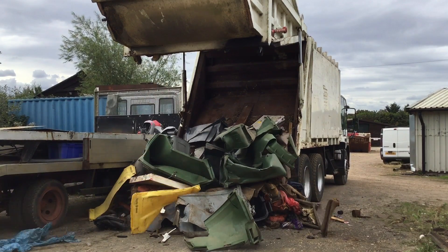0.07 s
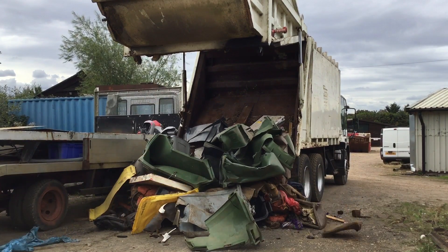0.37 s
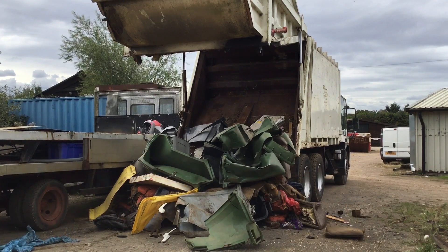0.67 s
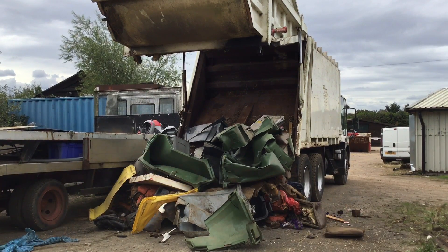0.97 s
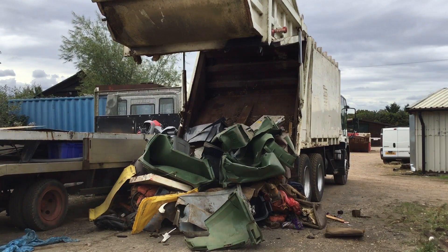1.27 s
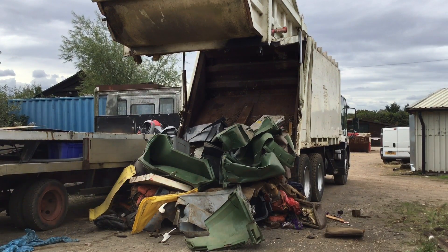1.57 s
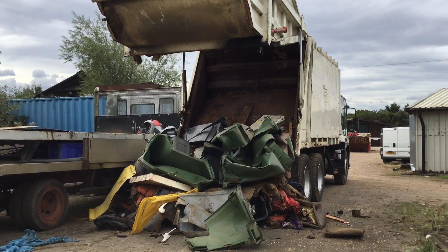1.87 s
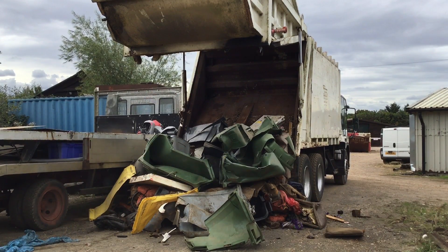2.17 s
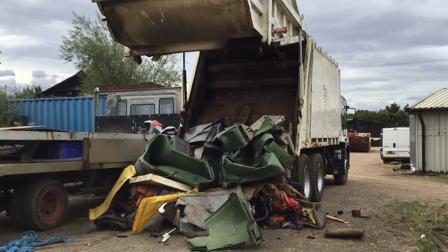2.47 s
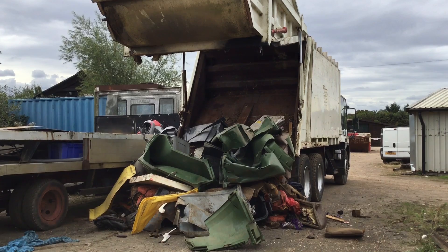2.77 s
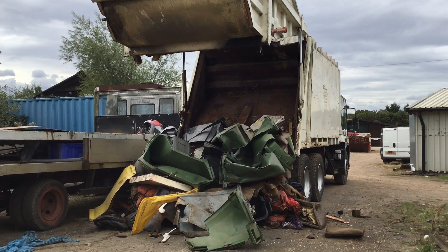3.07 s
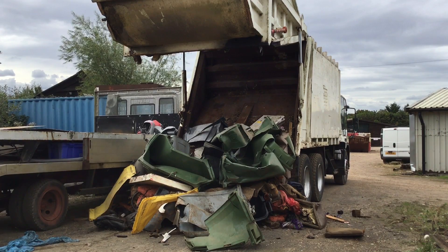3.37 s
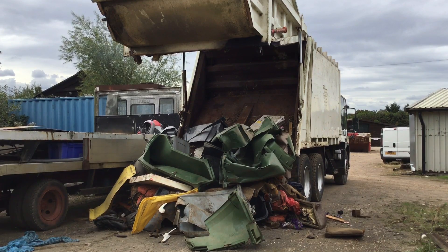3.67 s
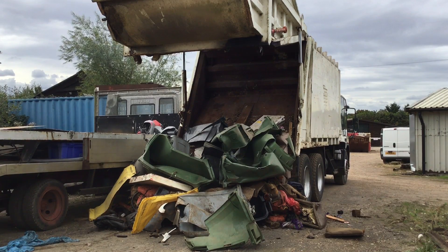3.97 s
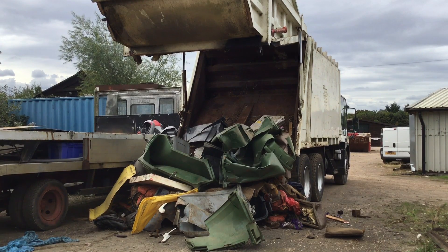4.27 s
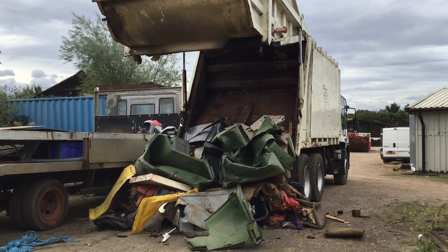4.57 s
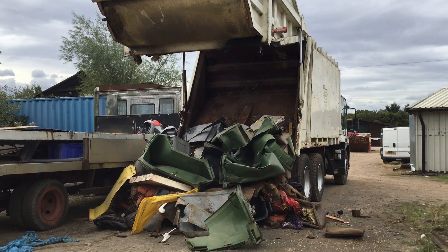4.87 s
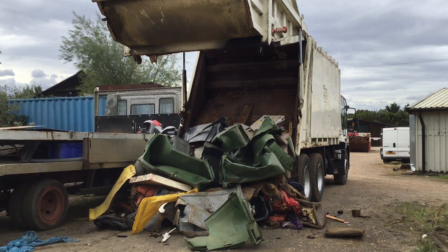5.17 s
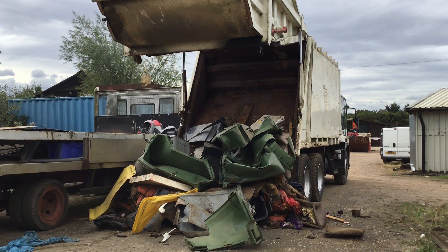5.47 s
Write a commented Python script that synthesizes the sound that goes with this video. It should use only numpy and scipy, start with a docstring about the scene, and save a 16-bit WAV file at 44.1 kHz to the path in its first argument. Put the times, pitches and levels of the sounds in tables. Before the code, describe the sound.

A refuse truck's diesel and hydraulic pump drone while its load slides out, hollow bins thudding, plastic cracking and metal clanking, then settling.

```python
"""Refuse truck dumping broken plastic bins.

A six-cylinder diesel at fast idle drives a humming hydraulic pump; gears whine, an oil valve whistles.
The load slides out over the steel floor, rumbling, scraping and squealing, while grit trickles.
Hollow bins boom, scrap metal clanks, plastic pieces crack and clatter.
The open steel body and the yard answer the crashes with a short tail."""
import sys
import numpy as np
from scipy import signal
from scipy.fft import rfft, irfft, next_fast_len
from scipy.io import wavfile
from scipy.ndimage import uniform_filter1d, map_coordinates

SR = 44100
rng = np.random.default_rng(int(sys.argv[2]) if len(sys.argv) > 2 else 0)


def waveform_to_disk(signal):
    """Save audio, clipped to [-1, 1], as 16-bit WAV at the path in sys.argv[1]."""
    frames = np.transpose(np.atleast_2d(signal))
    scaled = np.clip(frames, -1, 1) * 32767
    samples = np.round(scaled).astype(np.int16)
    wavfile.write(sys.argv[1], SR, samples)


N = 243873
TIME = np.arange(N) / SR
AGE = np.arange(SR // 2) / SR  # time since a blow [s]


def amp(db):
    """Decibels to gain."""
    return 10 ** (np.asarray(db) / 20)


def unit(x):
    """Scale to rms 1."""
    return x / np.sqrt(np.mean(x ** 2) + 1e-20)


def fade(t60):
    """Free decay, 60 dB in t60 seconds."""
    return np.exp(-np.log(1000) * AGE / np.maximum(t60, 1e-3))


def along(points, hz):
    """Interpolate (frequency, value) points on a log axis."""
    knots_hz, values = np.transpose(points)
    return np.interp(np.log(hz + 1), np.log(knots_hz + 1), values)


def curves(rows):
    """One value per sample for each column after the time."""
    times, *columns = np.transpose(rows)
    return [np.interp(TIME, times, column) for column in columns]


def wobble(rate_hz):
    """Smooth random curve, rate_hz knots a second."""
    return map_coordinates(rng.standard_normal(int(N * rate_hz / SR) + 4), [TIME * rate_hz])


def swell(centre_s, length_s):
    """Smooth rise from 0 to 1 and back."""
    return np.cos(np.pi * np.clip((TIME - centre_s) / length_s, -.5, .5)) ** 2


def resting(start_s=2.9, length_s=.9):
    """Ramp from 0 to 1 as the heap comes to rest."""
    return np.clip((TIME - start_s) / length_s, 0, 1)


def colour(x, gain_db):
    """Minimum-phase filter with response gain_db(hz)."""
    size = 2 * next_fast_len(len(x) // 2 + 4096)
    cepstrum = irfft(np.log(amp(gain_db(np.fft.rfftfreq(size, 1 / SR)))), size)
    cepstrum[1:size // 2] *= 2
    cepstrum[size // 2 + 1:] = 0
    return irfft(rfft(x, size) * np.exp(rfft(cepstrum)), size)[:len(x)]


def shaped(x, spectrum):
    """Filter by a spectrum table, scale to rms 1."""
    return unit(colour(x, lambda hz: along(spectrum, hz)))


def grains(size, per_s, spread_db):
    """Tiny contacts, random in time and strength."""
    contacts = (rng.random(size) < per_s / SR) * rng.choice([-1, 1], size)
    return contacts * amp(spread_db * np.clip(rng.standard_normal(size), -2, 2))


def modes(table):
    """Damped sines of a struck piece, slightly different at each blow."""
    return sum(amp(db + rng.normal(0, 2)) * fade(t60) * np.sin(2 * np.pi * hz * rng.normal(1, .008) * AGE)
               for hz, db, t60 in table)


def excite(force, ring):
    """Drive a ringing piece with a contact force."""
    return signal.fftconvolve(force, ring)[:len(AGE)]


def add(track, s, db, blow):
    """Mix in a blow at time s, its loudest 20 ms at db rms."""
    start = max(round(s * SR), 0)
    loudest = np.sqrt(uniform_filter1d(blow ** 2, size=882).max())
    track[start:start + len(blow)] += (amp(db) * blow / loudest)[:N - start]


def whistle(path, waver_hz):
    """Unsteady sine along (time [s], pitch [Hz], level [dB]) points."""
    hz, db = curves(path)
    gain = amp(db + 3 * wobble(15))
    return gain * np.sin(2 * np.pi * np.cumsum(hz + waver_hz * wobble(400)) / SR)


def shaft_tone(turns, order, drift_rad):
    """Sine of rms 1 at a multiple of the shaft rate."""
    return np.sqrt(2) * np.sin(2 * np.pi * (order * turns + rng.random()) + drift_rad * wobble(9))


# Reverberation: (frequency [Hz], t60 [s])
YARD_DECAY = [(100, 0.36), (1000, 0.17), (5000, 0.15), (14000, 0.31)]
def yard(x):
    """The steel body and nearby walls return a short diffuse tail."""
    hz, age, noise = signal.stft(rng.standard_normal(SR // 2), SR, nperseg=256)
    decay = np.exp(-np.log(1000) * age / along(YARD_DECAY, hz)[:, None])
    tail = signal.istft(noise * decay, SR, nperseg=256)[1]
    delayed = np.pad(x, (400, 0))
    return signal.fftconvolve(delayed, tail / np.linalg.norm(tail))[:N]


# Shaft tones: (order [per turn], rms level [dB])
HUM_ORDERS = [(3, -33), (5, -51), (6, -45.5), (8, -56.5), (9, -48), (10, -36), (12, -55), (12.5, -56),
              (13.5, -59.5), (14.5, -56), (15.5, -55.5), (17.5, -55), (18.5, -54), (20, -47.5), (22, -57.5),
              (24, -65.5), (26, -66.5), (30, -62), (31, -61), (33, -60.5), (34, -57.5), (35.5, -61),
              (39, -58.5), (39.5, -63.5), (40, -59.5), (42, -64), (44, -64.5), (72, -63), (84, -64.5),
              (136, -62)]
def hum(turns):
    """Tones locked to the shaft: firing at order 3, pump at order 10."""
    return sum(amp(db + 0.15 * wobble(5)) * shaft_tone(turns, order, 0.012 + 0.00074 * order)
               for order, db in HUM_ORDERS)


def gear_whine(turns):
    """The mesh throbs once a turn, strains once at a higher pitch and eases as the load comes off."""
    throb_depth = .4 + .35 * resting()
    throb = 1 + throb_depth * np.sin(2 * np.pi * turns)
    mesh = amp(.5 * wobble(10)) * shaft_tone(turns, order=102, drift_rad=.15) * throb
    strain = swell(centre_s=1.38, length_s=.7)
    strained = amp(-49.5) * strain * shaft_tone(turns, order=103, drift_rad=.4)
    return amp(-54.5 - 2.5 * resting()) * (1 - strain / 2) * mesh + strained


# Valve gear and injector pulsing: (order [per turn], depth [dB])
CLATTER_BEATS = [(1, .85), (2, .95), (5, .65), (6, .75), (11, .75), (12, .65), (16, .6)]
# Engine block: (frequency [Hz], gain [dB])
BLOCK_SPECTRUM = [(150, -31), (300, -16.5), (380, -7), (490, -18), (560, -17), (740, -11.5), (900, -23),
                  (1300, -25), (1680, -25), (2200, -27), (3200, -28), (4700, -29.5), (6500, -41),
                  (9500, -51), (11500, -57.5), (16000, -67.5)]
# Engine covers: (centre [Hz], width [Hz], lift [dB])
COVER_PEAKS = [(628, 116, 4.5), (1284, 274, 11), (1932, 157, 10.5), (2550, 730, 7)]
def clatter(turns):
    """Diesel knocks ring block and covers; part of them repeats every two-turn cycle."""
    cycle = rng.standard_normal(round(2 * SR * TIME[-1] / turns[-1]))
    repeated = map_coordinates(cycle, [turns / 2 % 1 * len(cycle)], mode="grid-wrap")
    knocks = .72 * repeated + .68 * rng.standard_normal(N)
    beat_db = sum(db * np.cos(2 * np.pi * (order * turns + rng.random())) for order, db in CLATTER_BEATS)
    covers = lambda hz: sum(db / (1 + (2 * (hz - mid) / width) ** 2) for mid, width, db in COVER_PEAKS)
    body_db = lambda hz: along(BLOCK_SPECTRUM, hz) + covers(hz)
    return amp(-46.5) * unit(colour(knocks * amp(beat_db), body_db))


# Crankshaft: (time [s], speed [turns/s])
SHAFT_SPEED = [(0, 18.3), (1.0, 18.26), (1.6, 18.27), (2.4, 18.31), (3.2, 18.32), (4.4, 18.34),
               (5.53, 18.33)]
# Exhaust noise: (frequency [Hz], gain [dB])
EXHAUST_SPECTRUM = [(22, -6), (36, -7), (55, 4), (85, 11), (140, 1), (270, -10), (380, -8.5), (520, -46.5),
                    (2000, -67)]
def engine():
    """Diesel at fast idle; the recorder's gain control briefly ducks the low hum after the heavy thud."""
    turns = np.cumsum(curves(SHAFT_SPEED)[0]) / SR
    tones = hum(turns)
    mechanics = gear_whine(turns) + clatter(turns)
    exhaust = amp(-41) * shaped(rng.standard_normal(N), EXHAUST_SPECTRUM)
    duck_db = np.interp(TIME, [2.79, 2.85, 3.07], [0, -9, 0])
    return amp(duck_db) * (tones + exhaust) + mechanics


# Oil valve: (time [s], pitch [Hz], level [dB])
VALVE_PATH = [(0, 9400, -90), (1.35, 9200, -77), (2.88, 9000, -86), (2.98, 9150, -72.5), (3.1, 9320, -80),
              (3.23, 9130, -74), (3.5, 8500, -75), (3.8, 8050, -86), (4.0, 7850, -79.5), (4.7, 7050, -82),
              (5.1, 6950, -95)]
def valve():
    """Oil whistles through the valve; as the flow grows the tone frays into hiss."""
    return whistle(VALVE_PATH, waver_hz=110 + 450 * swell(centre_s=3.55, length_s=.8))


# Stick-slip squeals: (start [s], length [s], pitch [Hz], mid level [dB])
SQUEALS = [(.38, .09, 14520, -69), (1.0, .1, 5250, -61), (1.14, .13, 5070, -59.5), (1.39, .08, 5070, -58.5),
           (1.49, .22, 5460, -64), (2.23, .13, 14790, -69.5), (2.48, .22, 14450, -72)]
def squeals(swell_db=8):
    """Plastic sticks and slips on steel; each squeal swells and fades around one pitch."""
    out = np.zeros(N)
    for s, length, hz, db in SQUEALS:
        path = [(s, hz, db - swell_db), (s + length / 2, hz, db), (s + length, hz, db - swell_db)]
        out += whistle(path, waver_hz=70) * (TIME > s) * (TIME < s + length)
    return out


# Grit streams: (crest time [s], level [dB])
TRICKLES = [(1.69, -57), (3.21, -63.5), (3.5, -60), (3.62, -57.5)]
# Falling grit: (frequency [Hz], gain [dB])
GRIT_SPECTRUM = [(300, -29), (1500, -4.5), (3500, 11.5), (5500, 5.5), (7000, -1.5), (9300, -4),
                 (12000, -13.5), (16000, -13)]
def grit(shed_db, rise_db_per_s=59, fall_db_per_s=85):
    """Grit falls off the moving load, and in streams that build up and run out."""
    streams = sum(amp(db - np.maximum(rise_db_per_s * (s - TIME), fall_db_per_s * (TIME - s)))
                  for s, db in TRICKLES)
    gain = np.hypot(amp(shed_db), streams) * amp(wobble(68))
    return gain * shaped(grains(N, per_s=6000, spread_db=2.2), GRIT_SPECTRUM)


# Sliding load: (time [s], effort [dB])
SLIDE_EFFORT = [(0, -1), (.3, -6), (.7, -4.5), (.8, -15), (1.1, -9), (1.4, -15), (2.03, -12.5), (2.18, 0.5),
                (2.29, -17.5), (2.47, -5), (2.7, -9.5), (3.0, -15.5), (3.6, -16.5), (4.0, -19.5),
                (5.53, -20.5)]
# Floor rumble, scraping, cracking plastic: (frequency [Hz], gain [dB])
RUMBLE_SPECTRUM = [(25, -33), (55, -2.5), (85, 1), (160, 10.5), (280, 5.5), (400, -22.5), (800, -42),
                   (3000, -99)]
SCRAPE_SPECTRUM = [(60, -31), (200, -1), (450, 12), (950, 1), (2000, -3), (4500, -22), (7000, -20),
                   (14000, -53)]
SHARD_SPECTRUM = [(150, -6), (400, -9), (780, -5), (1150, -11.5), (1600, -9), (2500, -15), (4400, -20.5),
                  (7000, -34.5), (11000, -42), (15500, -51)]
def slide():
    """The load drags over steel: more effort, more rumble, scrape, grit and stray fractures."""
    effort_db, = curves(SLIDE_EFFORT)
    settle_db = -11 * resting()
    rumble_db = -25.5 + effort_db + 1.3 * wobble(22.9)
    rumble = amp(rumble_db) * shaped(rng.standard_normal(N), RUMBLE_SPECTRUM)
    scrape_db = -37.5 + 0.99 * effort_db + settle_db + 2.6 * wobble(24.58)
    scrape = amp(scrape_db) * shaped(grains(N, per_s=2500, spread_db=8), SCRAPE_SPECTRUM)
    trickle = grit(shed_db=-53.5 + 0.54 * effort_db + settle_db)
    fractures = shaped(grains(N, per_s=100, spread_db=1.6), SHARD_SPECTRUM)
    crackle = amp(-45 + effort_db) * (1 - resting()) * fractures
    return rumble + scrape + trickle + crackle


# Heavy landings: (time [s], level [dB], pitch [Hz], length [s])
DROPS = [(0.242, -19.5, 185, .009), (0.659, -23, 120, 0.019), (2.141, -24, 159, 0.027),
         (2.18, -24, 89, 0.021), (2.753, -21.5, 61.5, .031)]
def drops():
    """A heavy piece hits the ground with one punch, smothered by the heap."""
    out = np.zeros(N)
    for s, db, hz, length in DROPS:
        push = (1 - np.exp(-AGE / .002)) * np.exp(-(AGE / length) ** 4)
        add(out, s, db, -push * np.sin(2 * np.pi * hz * AGE))
    return out


# Stiff panel; lids and rims: (frequency [Hz], level [dB], t60 [s])
PANEL_MODES = [(964, 11, 0.11), (1370, -11, 0.052), (1570, -6, 0.2), (1900, -21, 0.081)]
LID_MODES = [(355, 9, 0.097), (408, 1, 0.11), (492, 3, 0.042), (551, 2, 0.13), (612, 0.5, 0.091),
             (700, -0.5, 0.041)]
def clunk(at_s=2.855, rise_s=.006, decay_s=.028):
    """A toppling panel settles softly, rings hollow and knocks the lids under it."""
    out = np.zeros(N)
    envelope = np.exp(-AGE / decay_s) * (1 - np.exp(-AGE / rise_s))
    chatter = grains(len(AGE), per_s=4000, spread_db=3) * envelope
    edge = [(1100, 3.5), (2500, 3), (6500, 9.6)]  # (frequency [Hz], gain [dB])
    add(out, at_s, -41.5, excite(chatter, modes(PANEL_MODES) * fade(0.076)))
    add(out, at_s, -41.5, excite(chatter, modes(LID_MODES)))
    add(out, at_s, -41, colour(chatter, lambda hz: along(SHARD_SPECTRUM, hz) + along(edge, hz)))
    return out


# Splinters: (time [s], relative level [dB])
SNAPS = [(0.12, -21.5), (0.147, -23), (0.205, -21.5), (0.295, -29), (0.382, -29), (0.551, -33),
         (0.695, -32), (1.101, -24.5), (1.352, -31.5), (1.425, -32.5), (2.058, -30), (2.12, -20),
         (2.228, -25), (2.515, -28)]
# Brittle tear: (frequency [Hz], gain [dB])
SPLINTER_SPECTRUM = [(2500, -8), (6000, -4.5), (10000, -4), (12500, -7.5), (15500, -14)]
def snaps():
    """Splinters break off with a short bright tick."""
    out = np.zeros(N)
    for s, db in SNAPS:
        tear = grains(len(AGE), per_s=16000, spread_db=1.5) * fade(.045) * (1 - np.exp(-AGE / .003))
        add(out, s, db - 23.5, shaped(tear, SPLINTER_SPECTRUM))
    return out


# Blows on metal: (time [s], level [dB])
CLANKS = [(0.242, -47), (0.347, -50), (0.506, -42.5), (2.336, -47), (2.387, -37.5), (2.411, -46),
          (2.481, -40), (2.578, -47)]
# Scrap metal: (frequency [Hz], level [dB], t60 [s])
SCRAP_MODES = [(1556, 0, .22), (2284, -7.5, .16), (2820, -3.5, 0.08), (3144, -6, .11), (3250, -9, .07),
               (3688, -7, 0.17), (4310, -9, 0.17), (5270, -14, 0.18), (5636, -16, 0.2)]
def clanks():
    """Single hard blows ring one piece of scrap metal."""
    out = np.zeros(N)
    for s, db in CLANKS:
        add(out, s, db, modes(SCRAP_MODES))
    return out


# Broad pieces: (time [s], level [dB], pitch [Hz], t60 [s])
SLABS = [(0.053, -23.5, 548, 0.091), (0.243, -30, 559, .08), (0.268, -29, 479, 0.1), (0.347, -39, 980, .09),
         (0.481, -41, 1480, 0.09), (0.129, -27, 333, 0.089), (0.242, -24.5, 327, 0.095),
         (0.356, -33.5, 330, 0.12), (2.156, -24.5, 328, 0.11), (2.312, -41, 644, .07),
         (2.387, -36.5, 1107, 0.069), (2.478, -27, 398, 0.15), (2.481, -35, 940, .09),
         (2.482, -33, 608, 0.073), (2.604, -48, 1585, .1), (2.73, -41, 985, 0.13),
         (2.76, -35.5, 705, 0.053), (2.772, -41, 960, .08), (2.859, -38, 1157, .08),
         (3.114, -39.5, 818, 0.07)]
# Slab partials: (frequency ratio, level [dB])
SLAB_MODES = [(0.611, -1), (1, 0), (1.37, -14), (2.44, -18.5)]
def slabs():
    """A broad piece knocks, chatters briefly and rings at its own pitch."""
    out = np.zeros(N)
    for s, db, hz, t60 in SLABS:
        strike = grains(len(AGE), per_s=770, spread_db=2.6) * np.exp(-AGE / 0.021)
        strike[0] += 3.8  # first contact
        ring = modes([(hz * ratio, level, t60) for ratio, level in SLAB_MODES])
        add(out, s, db, excite(strike, ring))
    return out


# Clean breaks: (time [s], level [dB])
BREAKS = [(0.035, -32), (0.193, -36.5), (0.239, -35.5), (0.343, -34.5), (0.508, -41), (0.659, -41.5),
          (0.841, -41), (0.94, -45), (1.118, -38.5), (2.122, -34), (2.311, -43), (2.334, -41),
          (2.387, -33.5), (2.463, -33), (2.481, -32)]
# Thick plastic cracking: (frequency [Hz], gain [dB])
FRACTURE_SPECTRUM = [(200, -13), (600, 9.5), (1100, 2), (1800, 1.5), (2600, -6.5), (3700, -9.5),
                     (5500, -17), (9000, -39), (15500, -25)]
def breaks():
    """A thick piece gives way in one hard crack."""
    out = np.zeros(N)
    for s, db in BREAKS:
        add(out, s, db, shaped(rng.standard_normal(len(AGE)) * fade(0.066), FRACTURE_SPECTRUM))
    return out


# Bins landing: (time [s], relative level [dB], wall tone [Hz], overtone trim [dB], thud trim [dB])
LANDINGS = [(0.043, -25, 156, -12, -12), (0.117, -9, 200.6, -12, -8), (0.146, -10.5, 213, -23, -7),
            (0.186, -10, 190, -11.5, -10), (0.24, -16, 199, -10, -13), (0.346, -17.5, 251, -13, -20),
            (0.391, -21, 200, -22, -12), (0.488, -22, 215, -3.5, -21), (0.549, -16, 239, -13, -22),
            (0.612, -17, 196.4, -9, -9), (0.659, -16, 202, -11.5, -1.5), (0.692, -15, 222, -23, -5),
            (0.845, -16, 197, -15, -21), (0.94, -8, 189, -13, -19), (0.971, -13, 202, -31, -7),
            (0.998, -12, 213, -33, -20), (1.055, -10.5, 188.6, -30, -30), (1.74, -31, 210, -14, 0),
            (2.103, -16, 207, -21, -16), (2.142, -13.5, 228, -10, -7), (2.168, -13.5, 202.5, -5.5, -11.5),
            (2.333, -16, 196, -11.5, -10), (2.443, -15, 183, -12, -5), (2.469, -8, 213, -12, -19),
            (2.508, -17.5, 208, -16, -17), (2.706, -23, 184, -16, -3), (2.755, -20.5, 182.3, -4, -7),
            (3.15, -26, 205, -9, -5), (3.199, -30.5, 189, -14, 3), (3.48, -21, 170, -9, -2.5),
            (3.56, -20, 182.4, -12, -2.5), (3.76, -27, 150, -10, 2.5)]
# Bin wall overtones: (frequency ratio, level [dB])
WALL_MODES = [(1.299, 9), (1.551, -3.5), (1.85, -8), (2.3, -7)]
def booms():
    """Hollow bins boom with a wall tone and its overtones."""
    out = np.zeros(N)
    contact = 1 - np.exp(-AGE / 0.0035)
    for s, db, hz, overtone_db, _ in LANDINGS:
        add(out, s, db - 8.5, contact * modes([(hz, 0, .11)]))
        overtones = modes([(hz * ratio, level, .1) for ratio, level in WALL_MODES])
        add(out, s, db + overtone_db - 3, contact * overtones)
    return out


def thuds(ground_hz=109.8):
    """The ground under each landing bin gives a few deep, damped swings."""
    out = np.zeros(N)
    contact = 1 - np.exp(-AGE / 0.0059)
    for s, db, _, _, thud_db in LANDINGS:
        hz = ground_hz * np.exp(0.2 * rng.standard_normal())
        add(out, s, db + thud_db - 6, contact * modes([(hz, 0, .11), (hz * 1.37, -8, .08)]))
    return out


# Cracking pieces: (time [s], relative level [dB], lid trim [dB], treble edge [dB], fragment trim [dB])
CRASHES = [(0, -27.5, 2, 8.5, -16), (0.037, -28.5, 7.5, 2.5, -22), (0.052, -25.5, 2, 7, -23),
           (0.113, -23, -2, 7.5, -25), (0.146, -23.5, -4, -8, -28), (0.195, -35, 3.5, -6, -19),
           (0.212, -30.5, -11, 7, -25), (0.236, -26.5, 3, 11, -21), (0.266, -36, 6, 9, -21),
           (0.325, -23.5, -14, -5, -31), (0.347, -26.5, -2, 1, -18), (0.366, -31, -8, 2, -20),
           (0.38, -26.5, 0.5, 10.5, -29), (0.478, -24.5, -11, 6, -27), (0.506, -25, -4, 9.5, -30),
           (0.532, -30, -12, 9, -25), (0.658, -34.5, 3, 10, -7), (0.724, -34.5, -19, 13, -17),
           (0.841, -31, 2, 8, -10), (0.866, -29.5, 4.5, 5, -9), (0.939, -40, 17.5, 16.5, -14),
           (0.95, -29.5, -2, -13, -16), (1.118, -37.5, 3.5, -18, -8), (1.21, -39, 0, 8, -14),
           (2.122, -28.5, 1, -1, -19), (2.158, -34, 1, -3, -13), (2.31, -31.5, 3.5, 7.5, -12),
           (2.334, -25.5, -27, 5, -9.5), (2.358, -39, -2, 0, -16), (2.387, -25.5, -16, 12, -23),
           (2.412, -29, -13, 9, -19), (2.463, -24, -16, 9.5, -16), (2.481, -28, -0.5, -8, -9),
           (2.51, -29, -10, 5, -12), (2.538, -33, 1.5, 6, -7), (2.573, -27, -11, 5.5, -17),
           (2.602, -47, -2, 4, -10), (2.704, -32, -9, -2, -22), (2.759, -37, 6, -4, -10),
           (3.114, -41, 7.5, 1, -8)]
# Hard fragments: (frequency [Hz], level [dB], t60 [s])
FRAGMENT_MODES = [(950, -10.5, 0.22), (1230, -12, 0.047), (1190, -9, 0.043), (1545, 0, 0.056),
                  (2150, -27, 0.073), (2630, -15, 0.075), (3800, -39, 0.11)]
def crashes(crumple_s=0.034):
    """A dying run of small cracks rings lids and fragments; sharp fractures carry more treble."""
    out = np.zeros(N)
    for s, db, lid_db, edge_db, fragment_db in CRASHES:
        cracks = grains(len(AGE), per_s=4000, spread_db=5.2) * np.exp(-AGE / crumple_s)
        cracks += 0.19 * rng.standard_normal(len(AGE)) * fade(0.037)  # opening burst
        edge = [(3500, 0.0073), (6500, edge_db)]
        add(out, s, db - 10, colour(cracks, lambda hz: along(SHARD_SPECTRUM, hz) + along(edge, hz)))
        add(out, s, db + lid_db - 5.5, excite(cracks * fade(0.1), modes(LID_MODES)))
        pitch_ratio = np.exp(.12 * rng.standard_normal())  # fragments differ in size
        fragment = modes([(hz * pitch_ratio, level, t60) for hz, level, t60 in FRAGMENT_MODES])
        add(out, s, db + fragment_db - 6, excite(cracks * fade(.25), fragment))
    return out


def scene():
    """The falling load in its yard, over the running truck; mono."""
    sharp = crashes() + breaks() + slabs() + clanks() + snaps() + clunk()
    dull = booms() + thuds()
    echo = yard(amp(-6.5) * sharp + amp(-10) * dull)
    return (sharp + dull + drops() + echo + slide() + engine() + valve() + squeals())[None]


def record(dry, low_hz=36, top_hz=15900):
    """A small microphone loses the deepest bass and the highest treble."""
    thin = signal.sosfilt(signal.butter(2, low_hz, "highpass", fs=SR, output="sos"), dry)
    return signal.sosfilt(signal.ellip(10, .1, 80, top_hz, fs=SR, output="sos"), thin)


dry = scene()
out = record(dry)
waveform_to_disk(out)
```